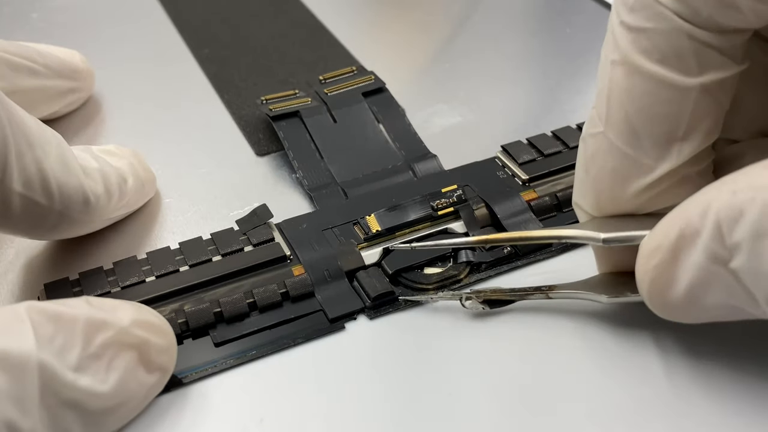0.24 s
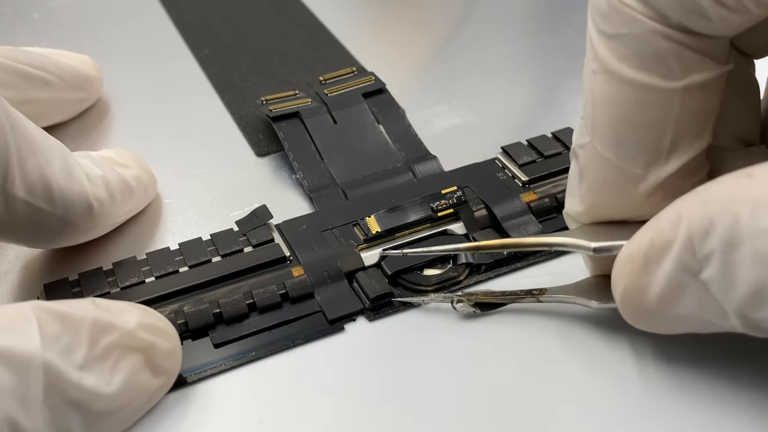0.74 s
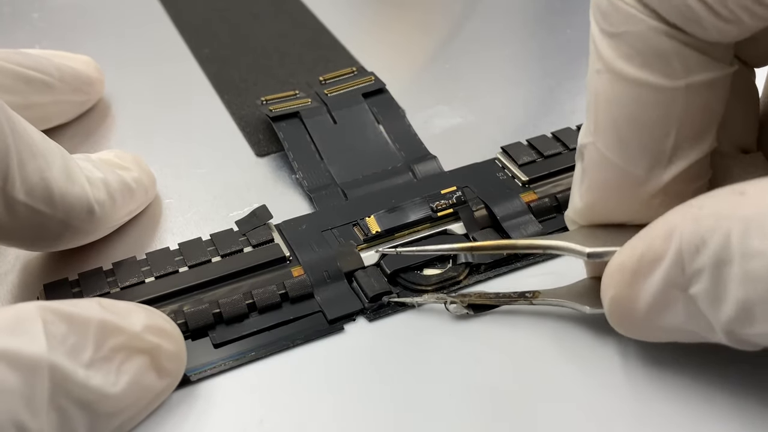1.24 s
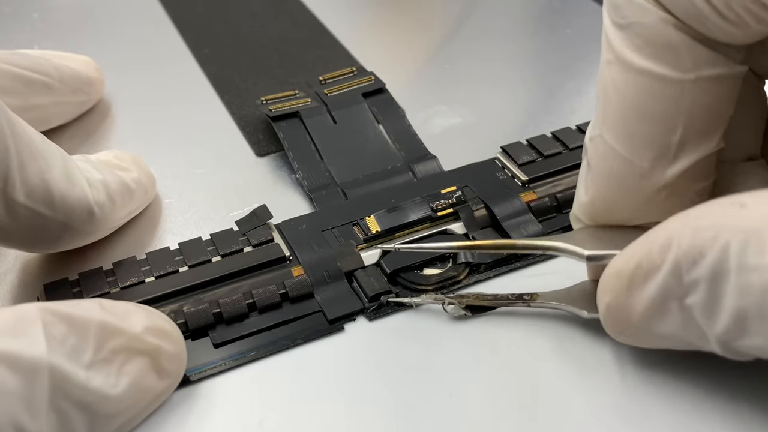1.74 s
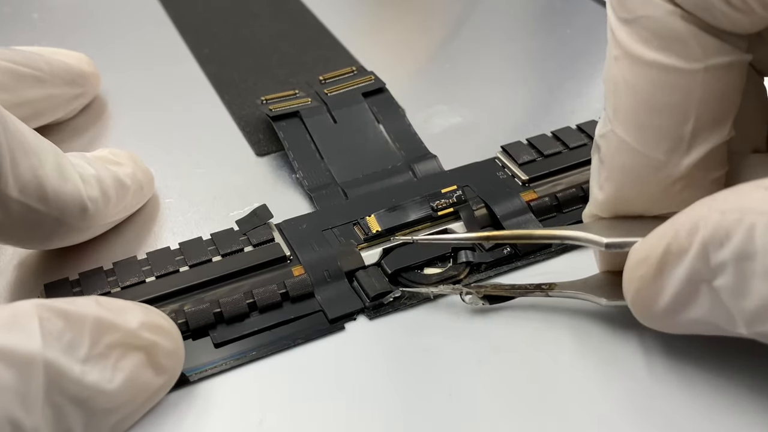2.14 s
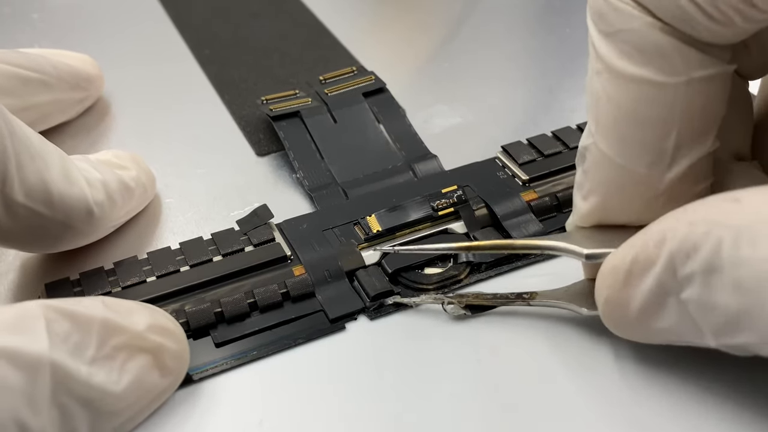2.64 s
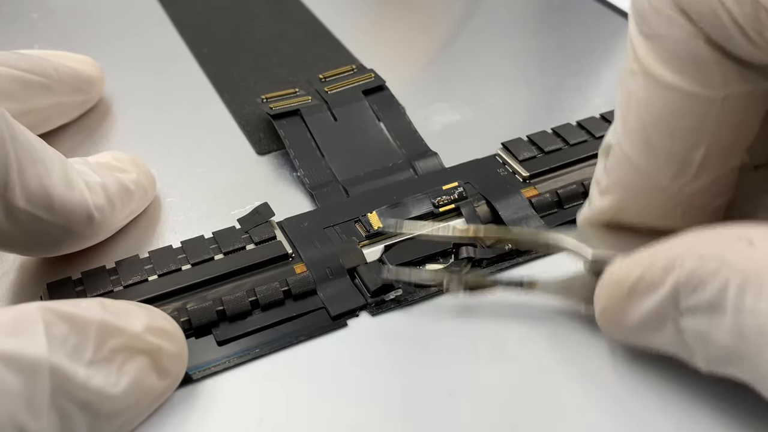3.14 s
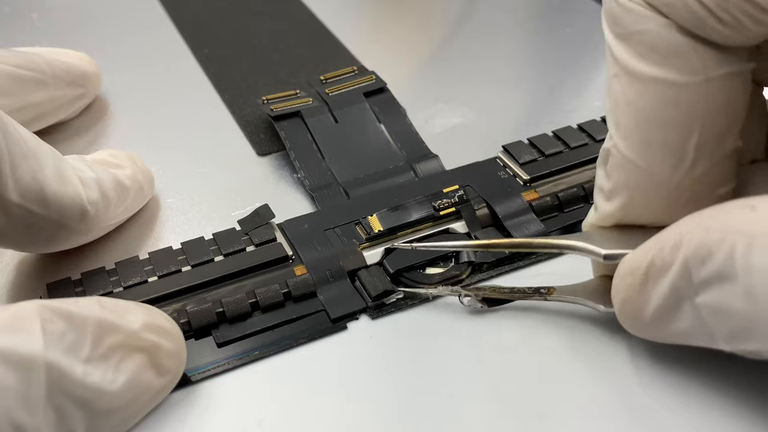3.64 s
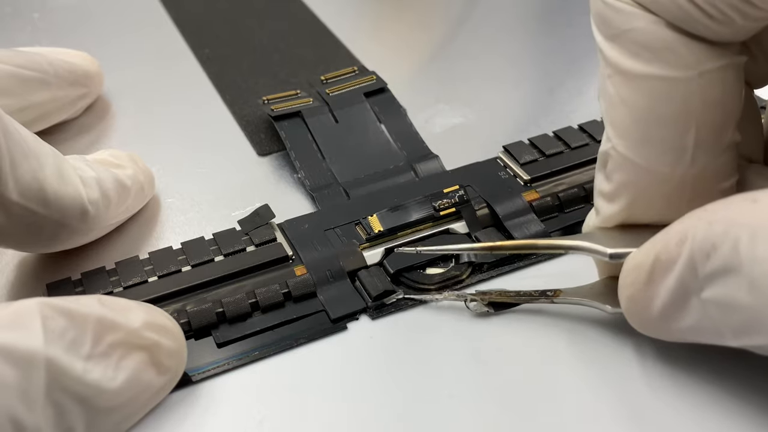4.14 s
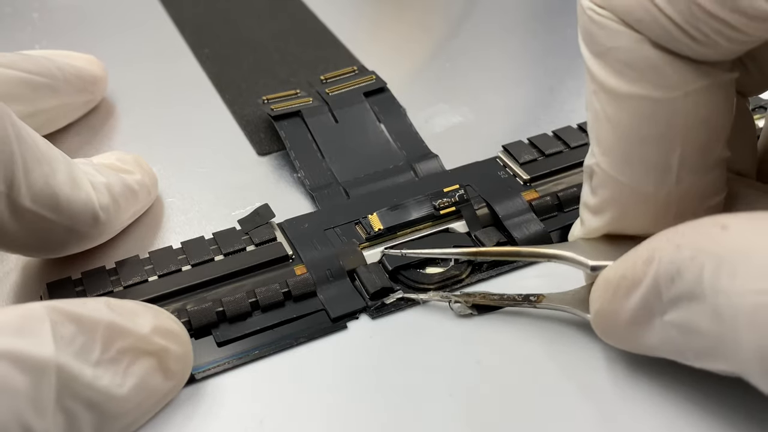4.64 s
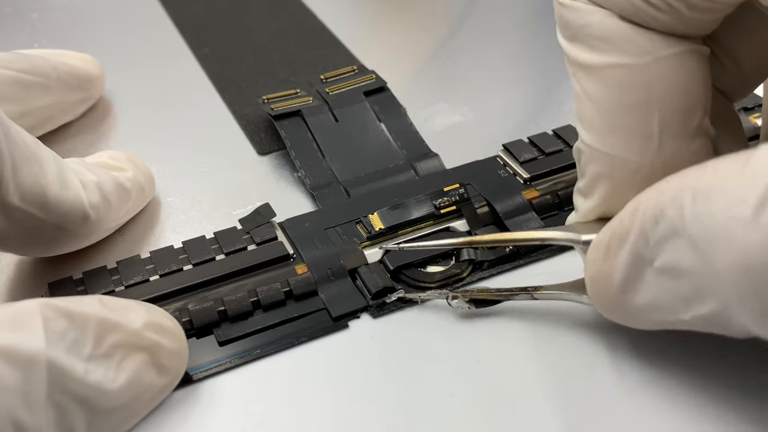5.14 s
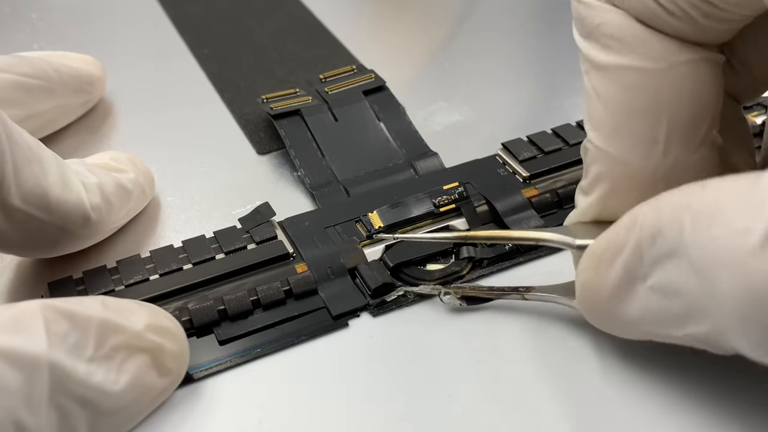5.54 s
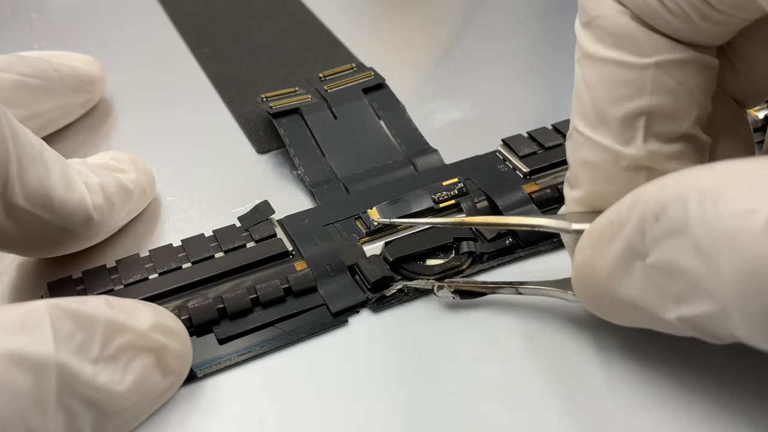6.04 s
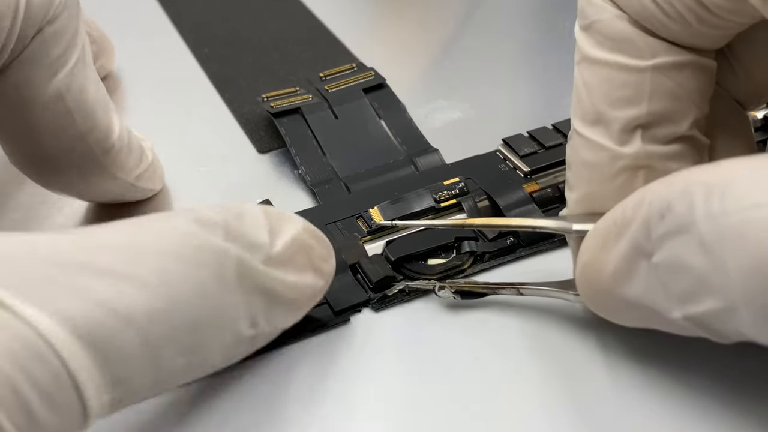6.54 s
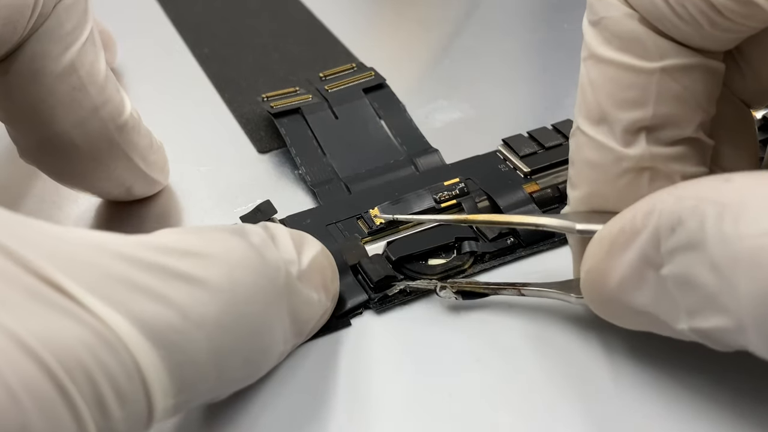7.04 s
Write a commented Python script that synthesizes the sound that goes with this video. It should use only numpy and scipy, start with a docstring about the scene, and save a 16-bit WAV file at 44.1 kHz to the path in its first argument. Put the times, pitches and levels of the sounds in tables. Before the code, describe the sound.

A steady low motor hum with soft airflow and a faint wavering whine lies under close, tiny repair sounds: irregular dry ticks, thin scraping, soft thumps on the bench and one tiny glove squeak after four seconds. Several bright snaps stand out, and a dense flurry of ticks leads to the loudest, just after six. Then almost only the fan remains. Close stereo pickup, very short room echo.

```python
"""Steel tweezers tick and snap against small parts on a circuit board, over the steady hum of a fan motor.
Gloved fingers rub, squeak once and knock the bench, which thuds. Contacts are chatter driving decaying modes,
rubbing is filtered noise and ringing friction grains, and the squeak is a stick-slip tone.
The fan is sines locked to one rotation, a few of them high and whining, over shaped and resonant air noise.
Two close microphone ports hear it all, with levels and phases that depend on frequency."""
import sys
import numpy as np
from scipy import signal
from scipy.fft import rfft, irfft
from scipy.io import wavfile

SR = 44100
rng = np.random.default_rng(int(sys.argv[2]) if len(sys.argv) > 2 else 0)


def bounce(signal):
    """Save signal as a 16-bit WAV file at the path given by the first command-line argument."""
    frames = np.transpose(np.atleast_2d(signal))
    limited = np.clip(frames, -1, 1)
    pcm = np.round(limited * 32767).astype(np.int16)
    wavfile.write(sys.argv[1], SR, pcm)


N = 321048

# Tips slipping off a part. Each row: start in seconds, then drive in dB of the low, body, board, steel,
# arms, spring, tips and edge modes, chatter time scale in ms, pitch ratio of the free steel.
SNAPS = [(.184, -55, -48, -54, -57, -56, -47, -48, -53, 1.2, 1.0),
         (.406, -52, -47, -54, -54, -50, -54, -46, -55, 1.3, 1.0),
         (1.908, -52, -56, -44.5, -45, -61, -51, -57, -58, 1.57, 0.98),
         (2.1695, -41, -40, -30.5, -33, -56, -38.5, -22.5, -28, 1.03, 0.97),
         (3.1252, -46, -54, -42, -36.5, -50, -39, -46, -40, 1.6, 1.02),
         (3.1555, -35, -25, -32, -24, -25, -22, -27, -25, 1.06, 1.05),
         (3.1592, -29, -27, -32.5, -28, -31, -29.5, -34, -18.5, 1.62, 1.14),
         (4.0893, -32, -26, -22.5, -21, -29, -21.5, -20, -31, 1.6, 0.974),
         (5.2582, -37, -46, -36.5, -30, -38, -42, -29, -39, 1.8, 0.87),
         (6.128, -58, -49, -47.5, -44, -44, -40, -36.5, -38, 1.7, 1.02),
         (6.3720, -31.5, -31, -28.5, -20, -16, -18, -9.5, -21, 1.63, 0.91)]
# Light touches. Each row: start in seconds, tips drive in dB, firmness in dB (how much more the lower parts ring).
TICKS = [(0.1514, -51, 1), (0.248, -44, -16), (0.344, -45, 2), (0.366, -50.5, 6), (0.398, -53, 9.5),
         (0.4527, -51, 7), (0.9368, -49.5, -6), (0.979, -46, -5), (1.0188, -45, -2), (1.088, -54.5, -2),
         (1.2143, -45.5, -2), (1.44, -47.5, -4), (1.4837, -48, -3), (1.521, -44, -2.5), (1.719, -47, 1.5),
         (1.96, -46.5, -14), (2.79, -50.5, -0.5), (2.825, -47, -9), (2.875, -48, -2), (2.9343, -46, -3),
         (3.1097, -47, -6), (3.1355, -40, -8), (3.4842, -53.5, 5.5), (3.714, -49.5, 0.5),
         (3.7723, -42.5, -4.5), (4.3122, -41.5, -1.5), (4.338, -48, 2), (4.384, -46.5, -9),
         (4.429, -47.5, 2.5), (4.8301, -50, 1.5), (4.8709, -53, -1), (5.013, -54, 1), (5.09, -54, 5),
         (5.281, -50, 2), (5.304, -45, -10), (5.324, -43, -7), (5.42, -62, 13), (5.551, -54, -2),
         (5.581, -53, -1), (5.681, -51, 4.5), (5.7455, -47, -2), (5.808, -44, -7), (5.838, -54, 1),
         (6.0419, -36.5, -6), (6.188, -48, 4), (6.2327, -42.5, -10), (6.2665, -53, -2), (6.2776, -45, -11),
         (6.288, -48, 2), (6.295, -37.5, -4), (6.322, -51, -1), (6.331, -46, 1), (6.336, -39, -3),
         (6.343, -47, 5), (6.9053, -48.5, 0.5)]
# Modes of the parts that ring, from low to high.
# Each row: frequency in Hz, relative level in dB, decay time t60 in seconds.
LOW_MODES = [(477, -2.4, 0.018), (660, -2.2, 0.016), (900, -0.5, 0.013)]
BODY_MODES = [(1123, -2, 0.011), (1280, 6, 0.0094), (1540, -1, 0.013), (1810, -5.5, 0.025)]
BOARD_MODES = [(2207, 8.5, 0.004), (2630, 8, 0.0052)]
STEEL_MODES = [(3930, 0.17, 0.0051), (4645, 0.83, 0.0058)]
ARM_MODES = [(5410, 2, 0.006), (6020, -2.5, 0.0091), (6460, 0.5, 0.0037)]
SPRING_MODES = [(7140, 0.83, 0.0028), (7800, -1.1, 0.012)]
TIP_MODES = [(8800, -0.037, 0.0034), (9570, 1.5, 0.0041), (10420, -1, 0.0031)]
EDGE_MODES = [(11160, -2, .004), (12600, -0.5, 0.0033), (14200, -1, 0.0028)]
TICK_CHATTER_MS = 1.5
# parts of a light touch against its tips, in dB at firmness 0
TICK_STEEL_DB, TICK_BOARD_DB, TICK_BODY_DB, TICK_EDGE_DB = -4.5, -12, -42.5, -1.5


def contact_rows():
    """Impact strength: light touches are written as snaps whose firmness raises the modes below the tips."""
    start_s, tips_db, firmness_db = np.transpose(TICKS)
    lower_db = tips_db + firmness_db
    body_db, board_db, steel_db = lower_db + TICK_BODY_DB, lower_db + TICK_BOARD_DB, lower_db + TICK_STEEL_DB
    chatter_ms = np.full_like(start_s, TICK_CHATTER_MS)
    light = [start_s, body_db, body_db, board_db, steel_db, steel_db, steel_db,
             tips_db, tips_db + TICK_EDGE_DB, chatter_ms, np.ones_like(start_s)]
    return np.vstack([SNAPS, np.transpose(light)])


def contact_chatter(chatter_ms):
    """Broadband excitation: short noise bursts of unit energy, flattened so they drive all pitches about evenly."""
    age = np.arange(256) / SR / np.maximum(chatter_ms / 1000, 1e-4)
    chatter = rng.standard_normal((len(chatter_ms), 3, 256))
    envelope = (age * np.exp(-age ** 2))[:, None]
    for sharpness in (1, .3, .3, .3):   # flattening smears the burst, so it is shaped again
        spectrum = rfft(chatter * envelope ** sharpness)
        chatter = irfft(spectrum / np.abs(spectrum) ** .85)
    return chatter / np.sqrt((chatter ** 2).sum(2, keepdims=True))


def tweezer_contacts():
    """Modal synthesis: each contact's chatter is convolved with the decaying sines of every part it strikes."""
    rows = contact_rows()
    chatter = contact_chatter(rows[:, -2:-1])
    age = np.arange(2048) / SR
    sounds = 0
    parts = [LOW_MODES, BODY_MODES, BOARD_MODES, STEEL_MODES, ARM_MODES, SPRING_MODES, TIP_MODES, EDGE_MODES]
    for column, modes in enumerate(parts, start=1):
        # a small part does not radiate lows
        crisp = signal.lfilter(*signal.butter(2, .7 * modes[0][0], "high", fs=SR), chatter)
        luck_db = 1.5 * rng.standard_normal((len(rows), len(modes)))
        # the grip sets how much steel is free
        pitch = rows[:, -1:] if modes in (STEEL_MODES, SPRING_MODES, TIP_MODES) else 1
        rings = 0
        for k, (hz, level_db, t60) in enumerate(modes):
            strength = amp(rows[:, column] + level_db + luck_db[:, k])
            decay = (-1) ** k * amp(-60 * age / t60)   # neighbouring modes start in opposite directions
            rings = rings + strength[:, None] * decay * np.sin(2 * np.pi * hz * pitch * age)
        sounds = sounds + signal.fftconvolve(crisp, rings[:, None], axes=2)[..., :len(age)]
    out = np.zeros((3, N))
    at = (rows[:, :1] * SR).astype(int) + np.arange(2048)
    np.add.at(out, (slice(None), at), np.swapaxes(sounds, 0, 1))
    return near_ports(with_tail(out))


# Gloves and tips sliding. Each row: start, loudest moment and end in seconds, then levels in dB of
# fine hiss, bright scrape and dull scrape. A row that ends before its loudest moment stays silent.
STROKES = [(0.16, 0.318, 0.39, -55, -58, -53), (0.372, 0.417, 0.51, -78, -70, -63),
           (0.477, .57, 0.68, -62, -89, -80), (0.584, 0.623, 0.65, -74, -63.5, -60),
           (0.8, 0.888, 1.06, -63, -84, -73), (1.32, 1.53, 1.65, -68.5, -69, -62),
           (1.7, 1.73, 1.88, -72, -80, -75), (1.75, 1.95, 2.33, -84, -72.5, -68.5),
           (2.366, 2.52, 2.55, -64.5, -71, -78), (2.714, 2.86, 3.07, -71, -70, -63.5),
           (3.085, 3.15, 3.3, -64, -67, -59), (3.64, 3.84, 4.04, -67.5, -73, -69),
           (4.296, 4.303, 4.52, -66, -70, -64), (4.578, 4.655, 4.76, -75, -74, -68),
           (4.78, 4.95, 5.36, -71, -74, -65), (5.244, 5.286, 5.9, -80, -76, -68),
           (5.5, 5.78, 5.95, -76, -74, -70), (5.937, 6.02, 6.54, -67.5, -85, -78),
           (6.039, 6.188, 6.22, -83, -82, -68), (6.256, 6.344, 6.42, -59, -67, -66),
           (6.374, 6.384, 6.46, -71.5, -50, -69), (6.472, 6.605, 6.2, -80.5, -87, -92.5)]
# Spectrum of the fine hiss. Each row: frequency in Hz, relative level in dB per Hz.
HISS_SPECTRUM = [(4000, 3), (7000, -1.5), (9500, 4), (14000, 0.5), (16000, -8.5)]
# Modes rung by bright and dull grains. Each row: frequency in Hz, relative level in dB, t60 in seconds.
BRIGHT_MODES = [(3540, -5, 0.0028), (4440, 0, 0.0052), (5610, -1, 0.011), (6560, 2.5, 0.0033),
                (9620, -0.5, .003)]
DULL_MODES = [(960, 5.5, 0.0098), (1350, -1, .008), (1780, 6, 0.016), (2660, -2.5, 0.0055)]
STROKE_EDGE_DB = 20.5   # a stroke starts and ends this far under its loudest moment
GRAINS_PER_S, GRAIN_CLUMP_DB, GRAIN_SPREAD_DB = 1400, 4.5 + .5, 4.5   # median rate, its swing, strength spread


def rubbing():
    """Sliding friction: a fine hiss, with catching grains that each set one mode of steel or board ringing."""
    noise = rng.standard_normal((3, N))
    layers = [rms_one(colour(noise * amp(2 * drift(150)), HISS_SPECTRUM))]
    rate = GRAINS_PER_S * amp(GRAIN_CLUMP_DB * drift(60))
    caught = rng.random(N) < rate / SR
    grains = caught * amp(GRAIN_SPREAD_DB * np.minimum(rng.exponential(1, N), 3))
    for modes in BRIGHT_MODES, DULL_MODES:
        dealt = rng.integers(0, len(modes), N)   # the mode each grain rings
        scrape = 0
        for k, (hz, level_db, t60) in enumerate(modes):
            scrape = scrape + amp(level_db) * ring(np.sign(noise) * grains * (dealt == k), hz, t60)
        layers.append(rms_one(scrape))
    gains = np.zeros((3, 1, N))
    for start, top, end, *levels_db in STROKES:
        off = arch(start, top, end)
        on = off < 1
        gains[..., on] += amp(levels_db)[:, None, None] * amp(-STROKE_EDGE_DB * off[on] ** 2)
    return near_ports((gains * layers).sum(0))


# Dull knocks of a finger on the bench.
# Each row: start in seconds, peak level in dB, nominal frequency in Hz, left-right difference in dB.
KNOCKS = [(1.371, -39, 1130, 11), (1.38, -31.5, 790, 18), (1.390, -39.5, 600, 14), (1.396, -37.5, 880, 18),
          (1.408, -50, 900, 13), (1.441, -41, 795, 15), (1.533, -43, 830, 16), (1.5395, -42, 650, 18),
          (1.5537, -39.5, 1200, 9), (1.569, -47, 900, 7), (2.954, -44, 1400, 12), (2.956, -31, 620, 11.5),
          (2.966, -57, 800, 10), (3.812, -38.5, 623, 13), (4.364, -56, 900, 0), (4.997, -35.5, 720, 13),
          (5.092, -42.5, 970, 4)]


def knocks():
    """Soft impact: a yielding fingertip gives a few milliseconds of noise in one low band."""
    out, age = np.zeros((2, N)), np.arange(900) / SR
    bursts = rng.standard_normal((len(KNOCKS), 900)) * age * np.exp(-age / .002)
    for (start_s, peak_db, hz, pan_db), burst in zip(KNOCKS, bursts):
        band = signal.butter(3, [hz * .33, hz * 1.2], "band", fs=SR, output="sos")
        knock = signal.sosfilt(band, burst)
        gains = amp([[peak_db + pan_db / 2], [peak_db - pan_db / 2]])
        i = int(start_s * SR)
        out[:, i:i + 900] += knock / np.abs(knock).max() * gains
    return with_tail(out)


# The bench thuds under snaps and knocks. Each row: start in seconds, drive in dB, pitch ratio.
THUDS = [(1.385, -44, 1.1), (1.553, -50, 1.06), (2.177, -34, 1.1), (2.829, -41, 0.8), (2.959, -42, 0.87),
         (3.164, -32, 1.01), (3.495, -38, 0.78), (4.1, -31, 1.06), (4.671, -43, 1.2), (5.0, -41, 0.83),
         (5.266, -38, 0.92), (6.378, -47, 0.88)]
# Bench top modes.
# Each row: frequency in Hz at pitch ratio 1, relative level in dB, rise time in seconds, left lead in radians.
BENCH_MODES = [(75.3, 0.5, 0.016, 1.95), (100, -10, 0.066, 1.73), (192.5, -1, 0.004, 1.9),
               (274.6, -4, 0.008, 2.1)]


def thuds():
    """Resonant build-up: each mode of the bench top swings up to a peak and dies away."""
    out, age = np.zeros((2, N + SR)), np.arange(SR // 2) / SR
    luck_db = rng.standard_normal((len(THUDS), len(BENCH_MODES)))
    for (start_s, drive_db, ratio), row in zip(THUDS, luck_db):
        i = int(start_s * SR)
        for (hz, level_db, rise_s, lead), chance_db in zip(BENCH_MODES, row):
            swing = amp(drive_db + level_db + chance_db) * age / rise_s * np.exp(1 - age / rise_s)
            out[:, i:i + SR // 2] += swing * np.sin(2 * np.pi * ratio * hz * age + [[lead], [0]])
    return out[:, :N]


SQUEAK_S, SQUEAK_LENGTH_S, SQUEAK_DB = 4.305, .034, -48.5
SQUEAK_HZ, SQUEAK_ARCH_HZ, SQUEAK_EDGE_DB = 1880, 620, 9   # pitch and level arch up from the ends
SQUEAK_WOBBLE_HZ, SQUEAK_ROUGHNESS_DB = 120, 4.5
SQUEAK_OVERTONE, SQUEAK_HALF, SQUEAK_LEAD_RAD = .8, .35, .9   # overtones fade as it goes on, a half tone grows


def squeak():
    """Stick-slip: a glove's tone, rough in level, is edgy at first and alternates between slips later."""
    off = arch(SQUEAK_S, SQUEAK_S + SQUEAK_LENGTH_S / 2, SQUEAK_S + SQUEAK_LENGTH_S)
    late = np.clip((np.arange(N) / SR - SQUEAK_S) / SQUEAK_LENGTH_S, 0, 1)
    pitch_hz = SQUEAK_HZ + SQUEAK_ARCH_HZ * (1 - off ** 2) + SQUEAK_WOBBLE_HZ * drift(300)
    phase = 2 * np.pi * np.cumsum(pitch_hz) / SR + [[SQUEAK_LEAD_RAD], [0]]
    level = amp(SQUEAK_DB - SQUEAK_EDGE_DB * off ** 2 + SQUEAK_ROUGHNESS_DB * drift(400)) * (off < 1)
    overtones = SQUEAK_OVERTONE * (1 - late) ** 3 * (np.sin(2 * phase) + np.sin(3 * phase))
    half_tone = SQUEAK_HALF * late * np.sin(phase / 2)
    return level * (np.sin(phase) + overtones + half_tone)


# Motor orders. Each row: multiple of the rotation tone, left and right levels in dB,
# left lead in radians, level waver in dB.
MOTOR_ORDERS = [(1, -41.8, -50.8, -.35, .4), (2, -53, -45, -.97, .4), (4, -63.5, -64.5, -1.8, 1.5),
                (19, -72.5, -72, .9, 1.5), (20, -73, -80, -.35, 1.5), (33, -71.5, -72.5, .56, 1.8)]
# Swell of the highest order. Each row: time in seconds, level in dB, of which only the swing about the mean counts.
WHINE_SWELL = [(0.0, -83), (1.84, -81.5), (2.29, -84.5), (3.2, -76), (4.28, -84.5), (4.85, -76.5),
               (5.37, -84.5), (6.47, -78), (7.28, -78.5)]
MOTOR_HZ, MOTOR_SAG_HZ_PER_S, MOTOR_WANDER_HZ = 169.41, .031, .06   # rotation tone at the start, sinking slowly


def hum():
    """Order-locked tones: sines at multiples of a wandering speed, with their own level and phase at each port."""
    speed_hz = MOTOR_HZ - MOTOR_SAG_HZ_PER_S * np.arange(N) / SR + MOTOR_WANDER_HZ * drift(1.5)
    turn = 2 * np.pi * np.cumsum(speed_hz) / SR
    out = np.zeros((2, N))
    for order, left_db, right_db, lead, waver_db in MOTOR_ORDERS:
        phase = order * turn + rng.uniform(0, 2 * np.pi)
        level = np.sqrt(2) * amp(waver_db * drift(18.0))
        if order == MOTOR_ORDERS[-1][0]:
            swell_db = np.interp(np.arange(N) / SR, *np.transpose(WHINE_SWELL))
            level = level * amp(swell_db - swell_db.mean())
        out += level * [amp(left_db) * np.sin(phase + lead), amp(right_db) * np.sin(phase)]
    return out


# Spectrum of the fan's air noise. Each row: frequency in Hz, relative level in dB per Hz.
AIR_SPECTRUM = [(22, -36), (40, -19), (60, -22.5), (100, -0.5), (240, -2.5), (430, -9.5), (700, -0.5),
                (800, -10), (1050, -14), (1350, -14), (1950, -28.5), (2500, -21.5), (4100, -33.5),
                (5000, -34.5), (7000, -39), (11000, -45.5), (12500, -60.5), (16000, -61)]
# Air resonances of the fan housing. Each row: frequency in Hz, width in Hz, level in dB.
HOUSING_RESONANCES = [(715, 7.8, -68.5), (1400, 52, -70), (2470, 310, -69.5), (4040, 460, -70.5)]
# How the two ports hear the fan.
# Each row: frequency in Hz, share in common, left lead in radians, left-right difference in dB.
FAN_PORTS = [(60, .85, -.3, 1), (110, .6, -.6, 1), (240, .9, -.6, 0), (400, .7, -1, 0), (520, .8, -2.1, 0),
             (760, .8, -2.4, 0), (900, .75, -3.5, 0), (1400, .85, -4, -2), (1750, .7, -6, -4),
             (2100, .3, -7.3, -3), (2750, .4, -9.5, -2), (3300, .4, -12, 1), (5800, .35, -19, 0),
             (6800, .4, -18.5, 0), (8000, .6, -22, 0), (16000, .9, -34.5, 0)]
AIR_DB = -48   # whole air noise before the ports


def fan_air():
    """Flow noise: broadband noise and hooting air resonances waver together and arrive late on the left."""
    gusts = amp(.5 * drift(3))
    air = amp(AIR_DB) * rms_one(colour(rng.standard_normal((3, N)), AIR_SPECTRUM))
    hoots = colour(resonant_noise(HOUSING_RESONANCES), [(5000, 0), (7000, -40)])
    return gusts * ports(*(air + hoots), FAN_PORTS)


# Unsteady low drones under the hum. Each row: frequency in Hz, width in Hz, level in dB before the low-pass.
DRONES = [(46.44, 1.3, -59.5), (69.3, 6.8, -51.5), (81.4, 11, -62.5), (262.3, 7.5, -61)]
# How the two ports hear the drones.
# Each row: frequency in Hz, share in common, left lead in radians, left-right difference in dB.
DRONE_PORTS = [(0, 0.88, -0.18, 4.5), (303, 0.84, -0.39, -11)]


def drones():
    """Narrow-band noise: low resonances fluctuate at the rate of their width, with a low-pass at 400 Hz."""
    low_pass = signal.butter(2, 400, fs=SR, output="sos")
    return signal.sosfilt(low_pass, ports(*resonant_noise(DRONES), DRONE_PORTS))


MAINS_HZ, MAINS_DB, MAINS_LEAD_RAD = 101.5, -65, 4.1   # twice the mains rate; nearly opposite at the two ports


def mains():
    """Mains hum: a faint sine at twice the mains rate wavers in phase and level."""
    phase = 2 * np.pi * MAINS_HZ * np.arange(N) / SR + .5 * drift(3.3)
    level = np.sqrt(2) * amp(MAINS_DB + 2.1 * drift(4.4))
    return level * np.sin(phase + [[MAINS_LEAD_RAD], [0]])


# Echoes off the bench, then the room. Each row: level in dB, decay time t60 in seconds.
TAILS = [(-6.5, 0.051), (-21.5, 0.27)]


def with_tail(x):
    """Diffuse reverberation: adds echoes by convolving with decaying noise, a separate draw for each row."""
    response, age = 0, np.arange(int(.3 * SR)) / SR
    for level_db, t60 in TAILS:
        echo = rng.standard_normal((len(x), len(age))) * amp(-60 * age / t60) * (age > .002)
        response = response + amp(level_db) * echo / np.sqrt((echo ** 2).sum(1, keepdims=True))
    return x + signal.fftconvolve(x, response, axes=1)[:, :N]


# How the two ports hear the hands, whose treble reaches the right port first.
# Each row: frequency in Hz, share in common, left lead in radians, left-right difference in dB.
HAND_PORTS = [(0, .7, 0, 1), (1300, .6, 2, -1), (2400, .8, 1.3, 1), (4000, .8, .7, 5), (4800, .75, -1, 6),
              (6300, .6, -1, -1), (7300, .7, -2.7, -1), (8300, .75, -3.1, 0), (9500, .95, -5.4, 0),
              (16000, .97, -15.7, 0)]


def near_ports(x):
    """Near-field pickup: a sound made by the hands, as the two ports hear it."""
    return ports(*x, HAND_PORTS)


def ports(shared, left, right, table):
    """Partial coherence: mixes a common and two separate signals into left and right, band by band."""
    hz, (f, *columns) = np.fft.rfftfreq(N, 1 / SR), np.transpose(table)
    alike, lead, pan_db = (np.interp(hz, f, c) for c in columns)
    common = rfft(shared) * [np.exp(1j * lead), np.ones_like(lead)]
    both = np.sqrt(alike) * common + np.sqrt(1 - alike) * rfft([left, right])
    return irfft(both * amp([pan_db / 2, -pan_db / 2]), N)


def resonant_noise(table):
    """Resonance: three rows of noise through one-pole peaks of (Hz, width Hz, dB)."""
    f = np.fft.rfftfreq(N, 1 / SR)
    out = 0
    for hz, width_hz, level_db in table:
        spectrum = rfft(rng.standard_normal((3, N))) / (1 + 2j * (f - hz) / width_hz)
        out = out + amp(level_db) * rms_one(irfft(spectrum, N))
    return out


def colour(x, spectrum):
    """Spectral shaping: filters x by (Hz, dB) points joined on a logarithmic frequency axis."""
    hz, (f, db) = np.fft.rfftfreq(N, 1 / SR) + 1, np.transpose(spectrum)
    return irfft(rfft(x) * amp(np.interp(np.log(hz), np.log(f), db)), N)


def ring(x, hz, t60):
    """Damped oscillator: a unit click sets a sine of height 1 ringing."""
    r, w = amp(-60 / (t60 * SR)), 2 * np.pi * hz / SR
    return signal.lfilter([0, np.sin(w)], [1, -2 * r * np.cos(w), r * r], x + 1e-18)


def drift(rate):
    """Low-passed noise: a slow random course of spread 1, about rate turns a second."""
    r = np.exp(-80 * np.pi * rate / SR)   # drawn at every 40th sample
    slow = signal.lfilter([1], [1, -2 * r, r * r], rng.standard_normal(N // 40 + 2002))[2000:]
    return np.interp(np.arange(N) / 40, np.arange(len(slow)), rms_one(slow))


def arch(start, top, end):
    """Gesture envelope: distance from the top, 0 at the top and 1 at both ends."""
    return np.interp(np.arange(N) / SR, [start, top, end], [1, 0, 1])


def rms_one(x):
    """Normalisation: x scaled to unit rms."""
    return x / np.sqrt(np.mean(x ** 2) + 1e-20)


def amp(db):
    """Decibel law: the amplitude gain of a level in dB."""
    return 10 ** (np.asarray(db) / 20)


def scene():
    """Superposition: hands and tweezers with their echoes, over the fan."""
    hands = tweezer_contacts() + rubbing() + knocks() + thuds() + squeak()
    background = hum() + fan_air() + drones() + mains()
    return hands + background


CUTOFF_HZ = 16600


def record(dry):
    """Band limiting: a steep low-pass puts everything above the cutoff at least 70 dB down."""
    return signal.sosfilt(signal.cheby2(24, 70, CUTOFF_HZ, fs=SR, output="sos"), dry)


dry = scene()
out = record(dry)
bounce(out)
```